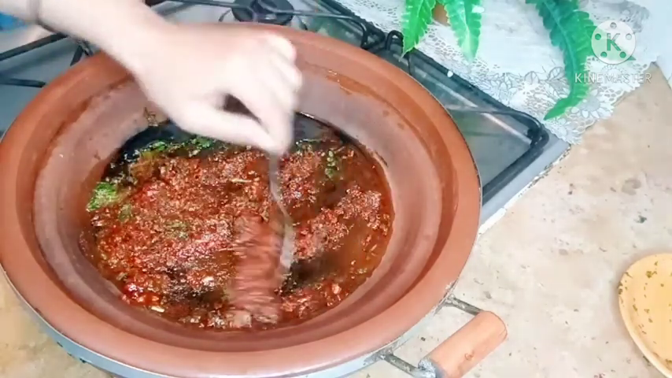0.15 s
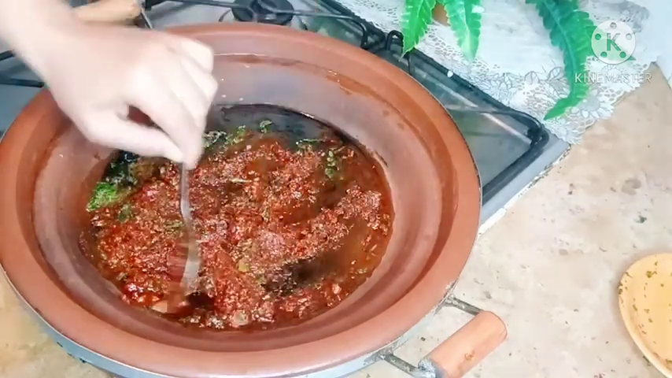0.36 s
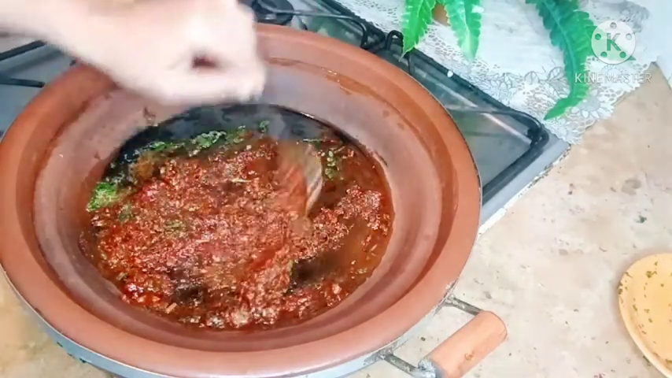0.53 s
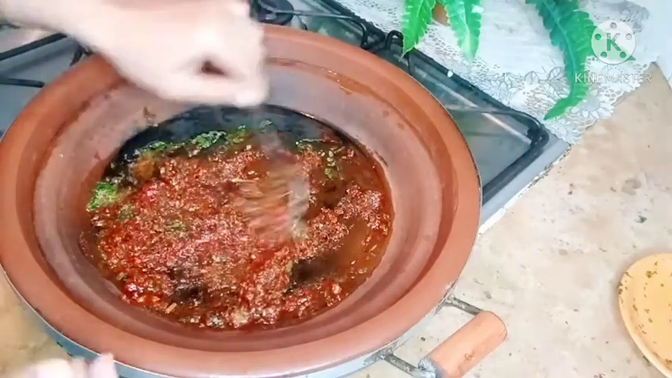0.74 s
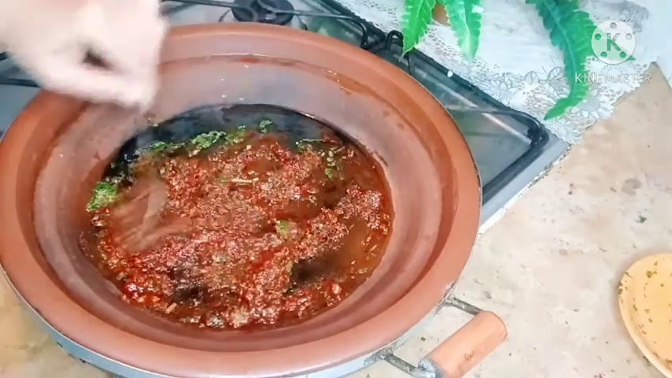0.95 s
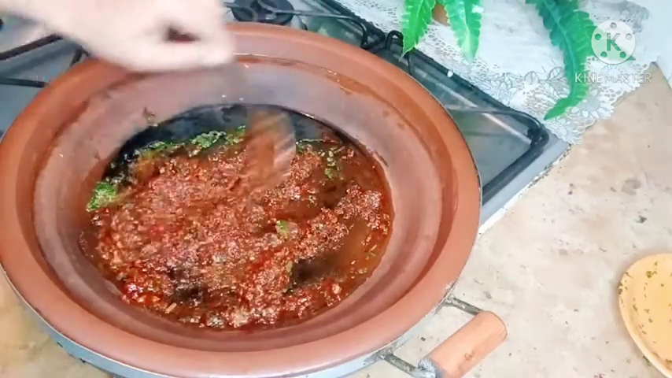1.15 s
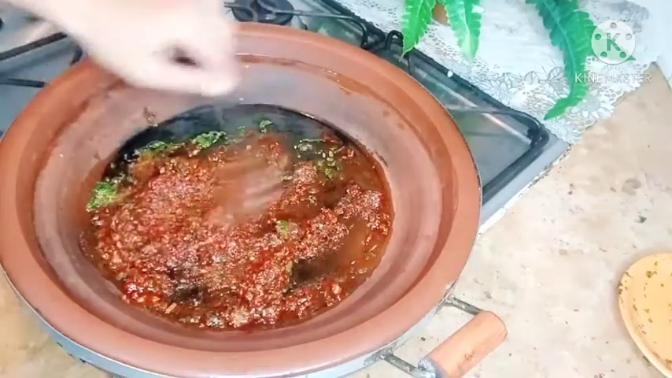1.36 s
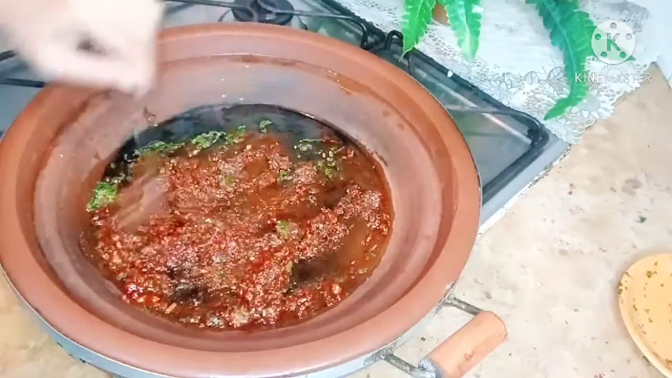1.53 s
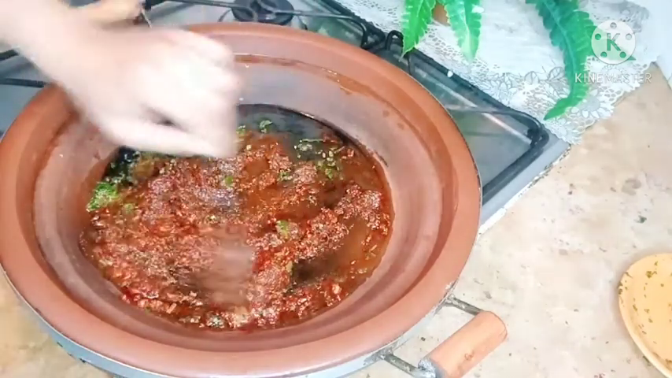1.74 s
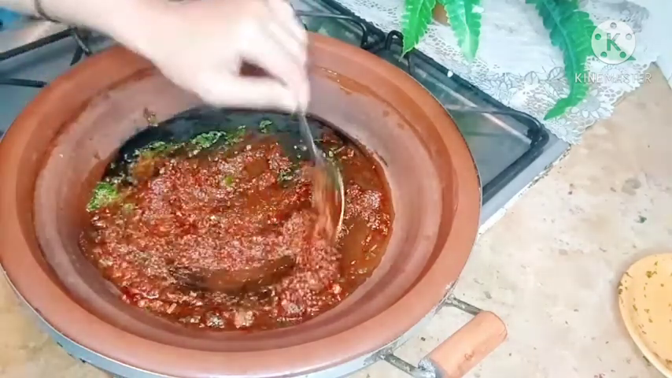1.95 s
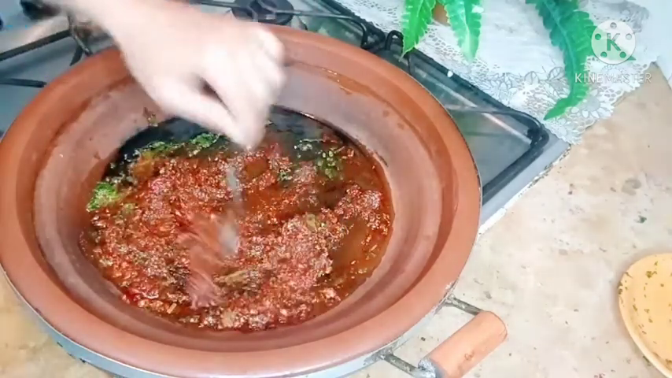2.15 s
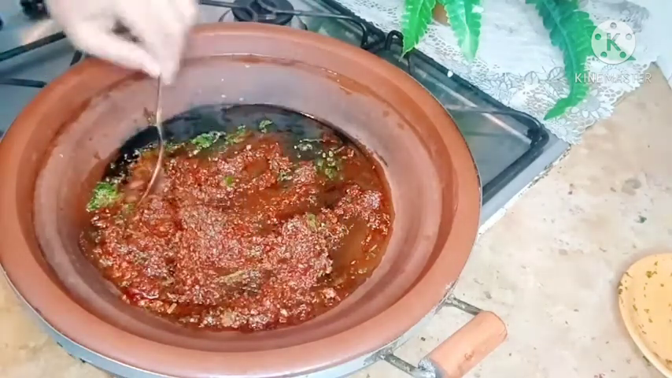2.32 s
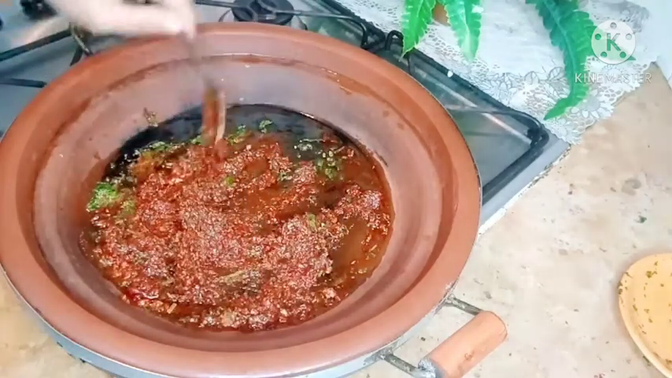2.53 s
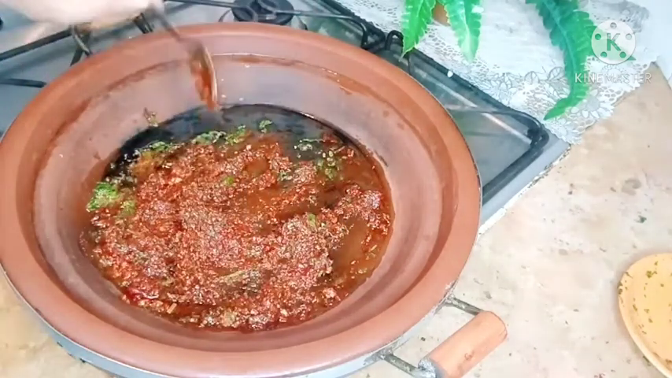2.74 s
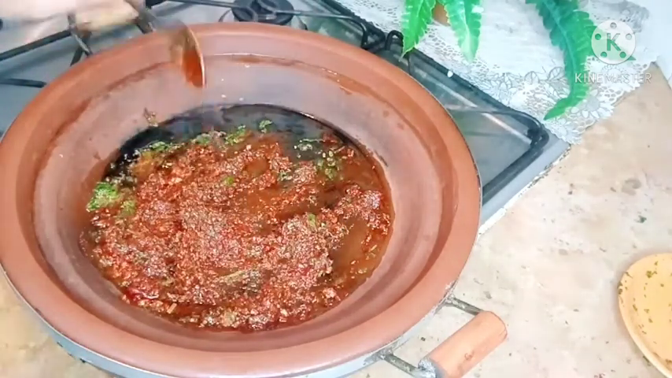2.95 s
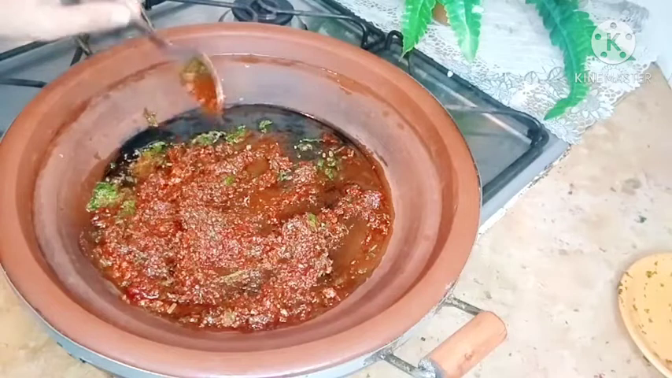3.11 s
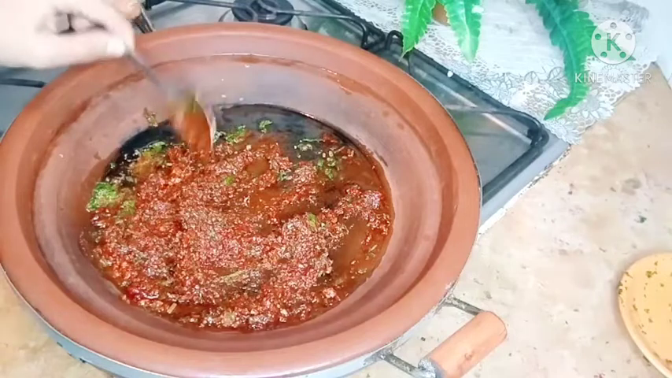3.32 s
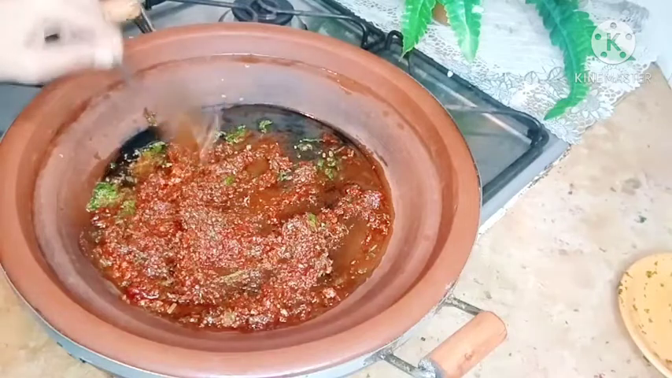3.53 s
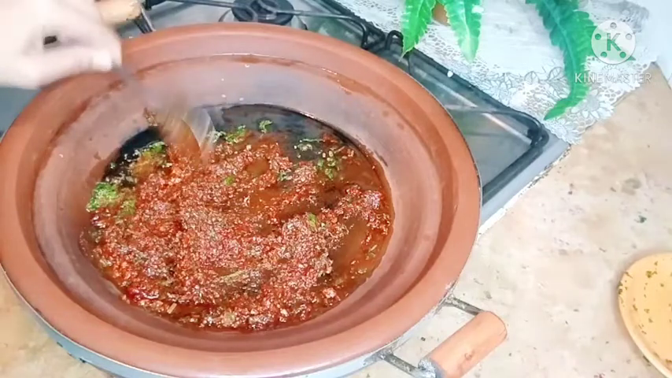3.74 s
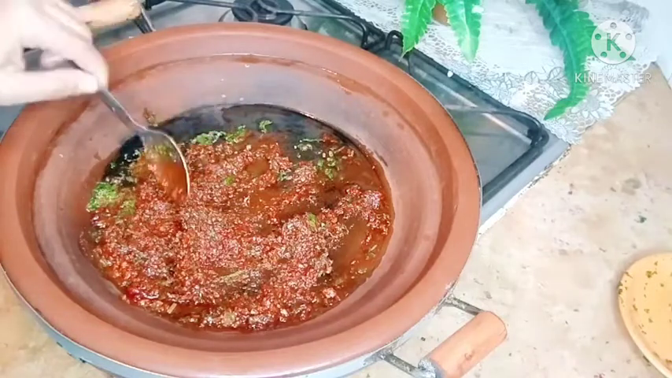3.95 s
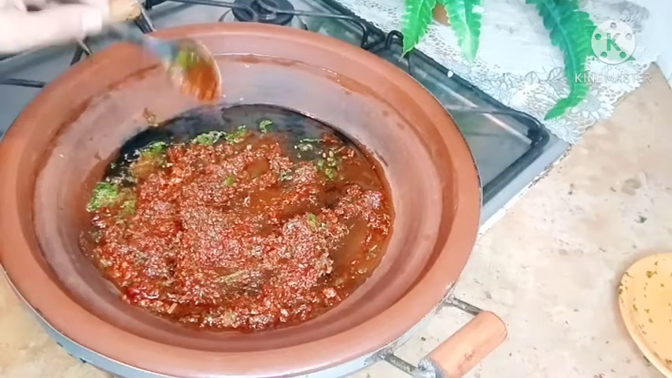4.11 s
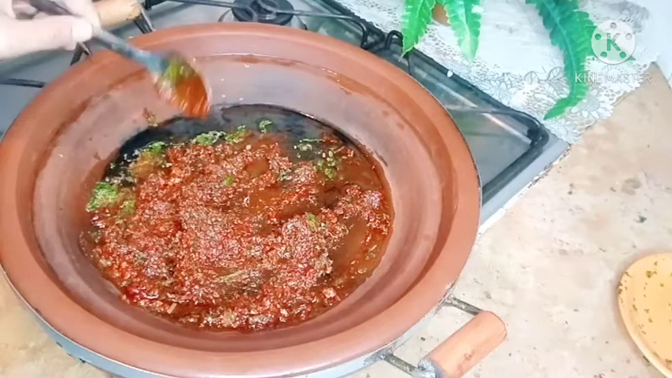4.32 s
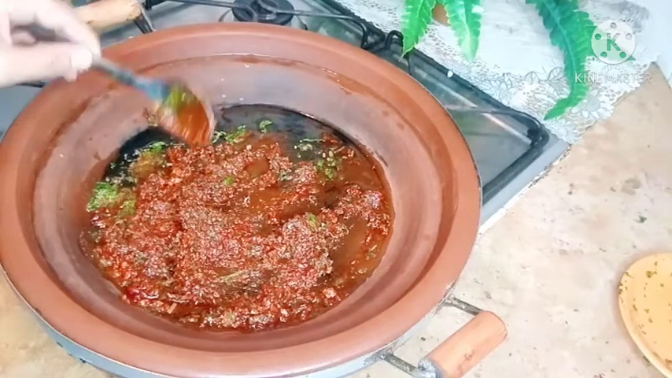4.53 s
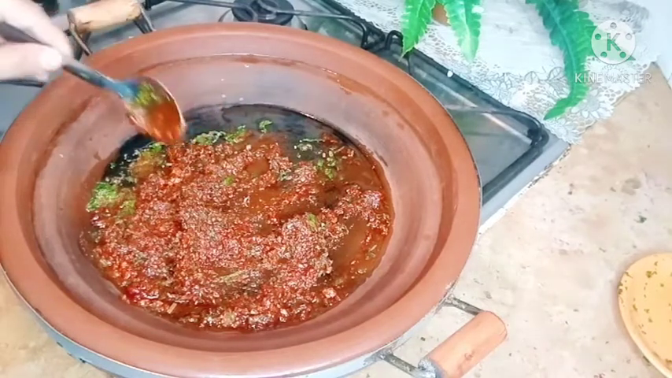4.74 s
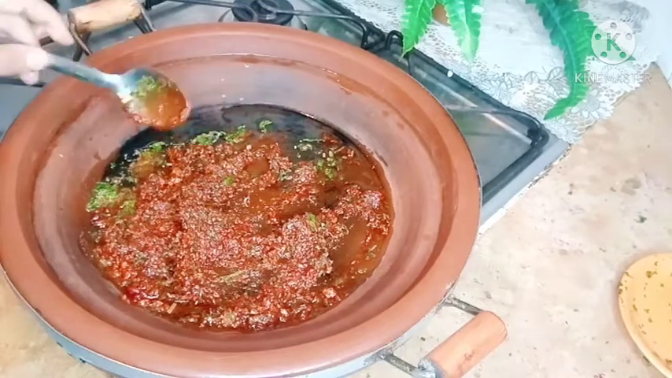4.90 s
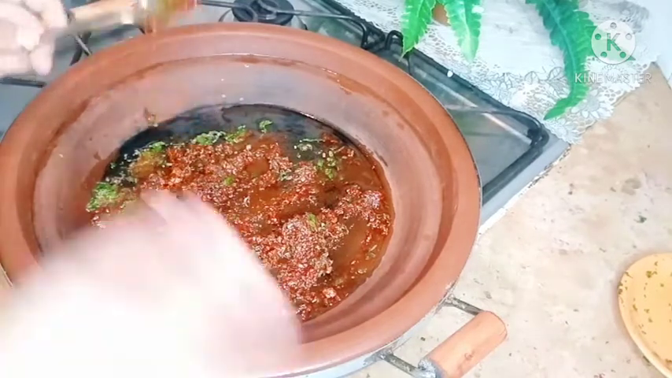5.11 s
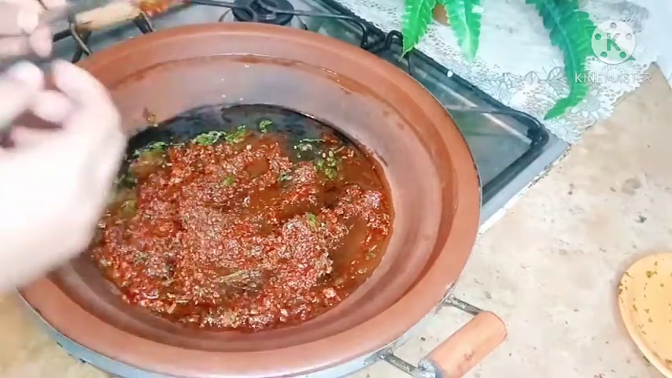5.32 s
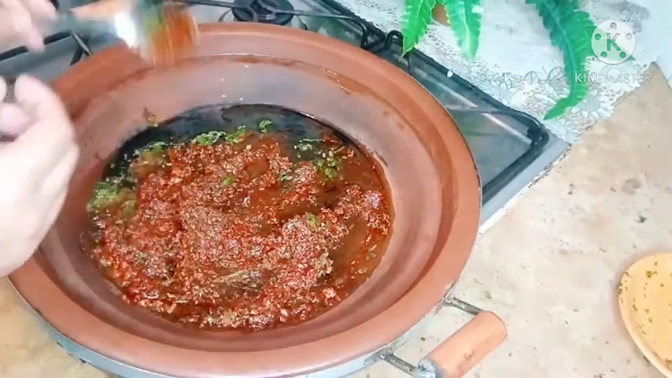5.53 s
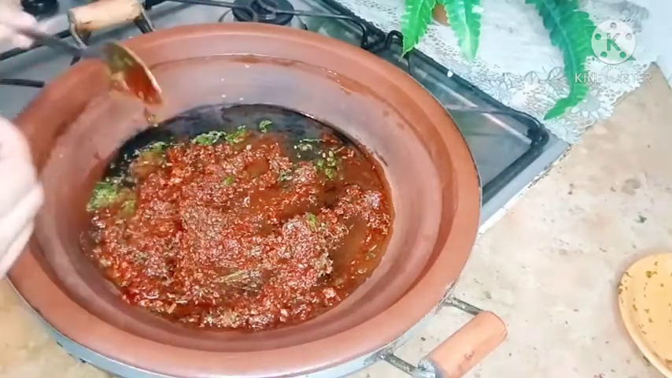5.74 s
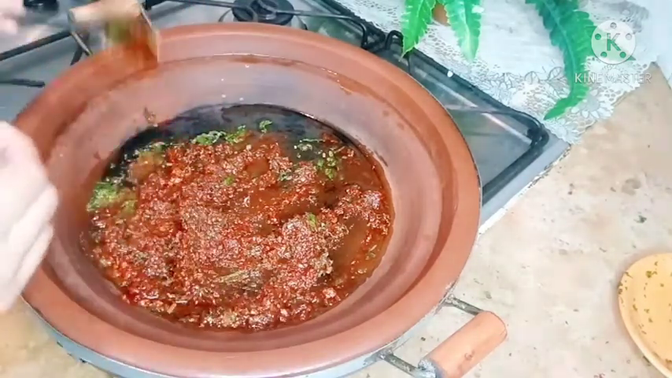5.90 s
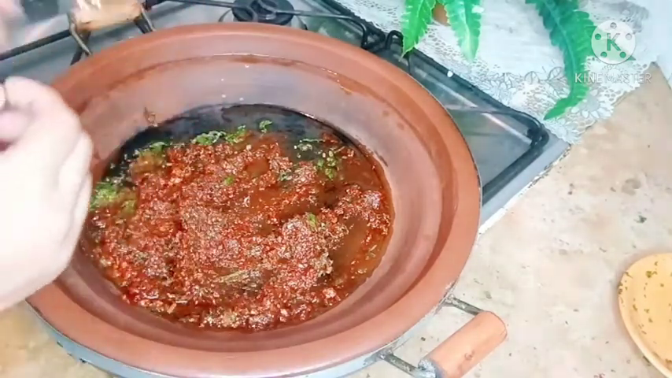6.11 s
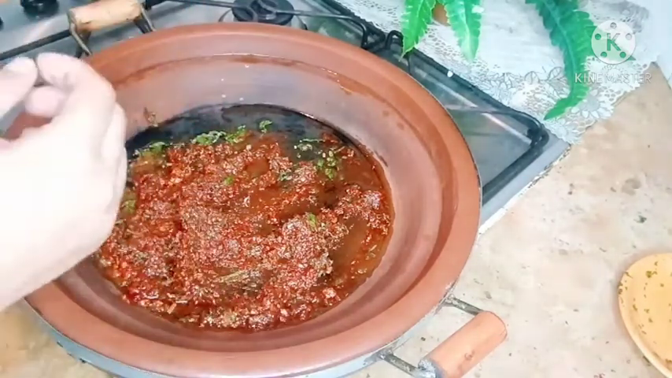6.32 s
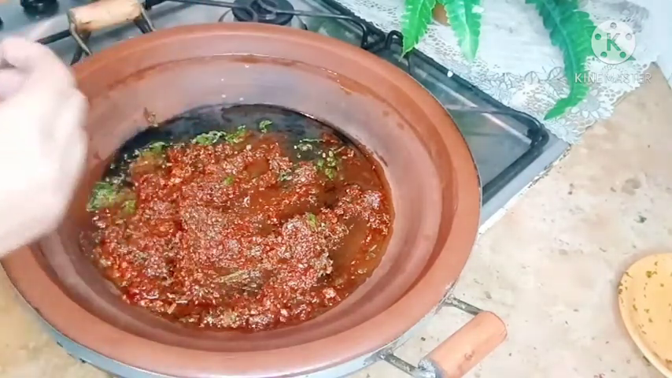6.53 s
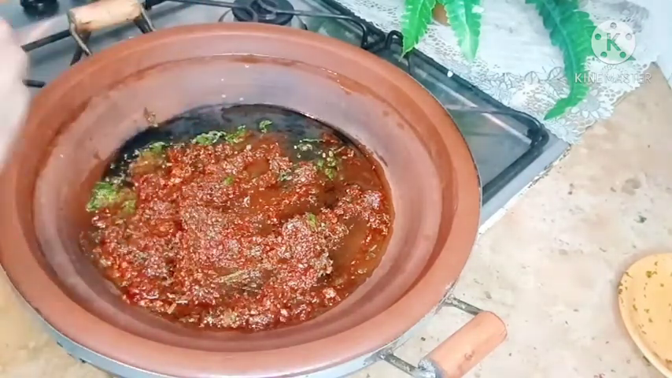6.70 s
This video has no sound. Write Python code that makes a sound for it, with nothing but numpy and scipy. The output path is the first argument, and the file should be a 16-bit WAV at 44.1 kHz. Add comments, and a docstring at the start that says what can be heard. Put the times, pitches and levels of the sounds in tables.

```python
"""A steel spoon stirs thick sauce in a clay pot on a gas stove, close by in a small kitchen.
Its scrapes are gritty noise through the pot's resonances; two raps on the wall also excite the spoon's own.
Smacks, bumps and one high squeak are short damped noise bursts; squelches mix noise, bubbles and ticks.
The burner rushes as noise in a hollow under the pot, the sauce simmers in a faint hiss with plops,
and an appliance hums on wavering sines over a low rumble."""
import sys
import numpy as np
from scipy import signal
from scipy.fft import rfft, irfft, next_fast_len
from scipy.io import wavfile
from scipy.ndimage import uniform_filter1d, map_coordinates

SR = 44100
rng = np.random.default_rng(int(sys.argv[2]) if len(sys.argv) > 2 else 0)


def wav_out(sig):
    """Save sig, one row per channel (or a flat mono array), as 16-bit PCM at SR to the path in sys.argv[1]."""
    wavfile.write(sys.argv[1], SR, np.round(np.clip(np.atleast_2d(sig).T, -1, 1) * 32767).astype(np.int16))


N = 302526
SPAN = np.arange(round(SR / 2)) / SR  # the time axis of one event, in seconds

# The filled pot's resonances. Each row: pitch in Hz, width in Hz, level in dB.
CLAY = [(328, 47, -2.5), (640, 135, -2), (946, 110, 2.5), (1216, 470, -0.5), (1773, 280, -0.5),
        (2024, 190, 0), (2540, 450, -3.5), (3220, 600, -3), (3910, 370, 0), (4780, 660, -1.5),
        (6220, 910, 2), (6980, 1850, -1.5), (10000, 3500, -5.5), (15220, 1660, -4.5)]


def amp(db):
    """Level law: 20 dB is a factor of ten in amplitude."""
    return 10 ** (np.asarray(db) / 20)


def unit(x):
    """Normalisation by mean power: scale to rms 1."""
    return x / np.sqrt(np.mean(x ** 2) + 1e-20)


def loudest(x, size):
    """Normalisation by short-time power: the loudest stretch of size samples gets rms 1."""
    power = uniform_filter1d(x ** 2, size, mode="constant")
    return x / np.sqrt(power.max() + 1e-20)


def along(points, hz):
    """Interpolation of (Hz, value) points on a logarithmic frequency axis."""
    f, v = np.transpose(points)
    return np.interp(np.log(hz + 1), np.log(f), v)


def filtered(x, response):
    """Linear filtering: the spectrum of x times a complex response of frequency."""
    m = next_fast_len(len(x) + SR // 4)  # the padding leaves room for the ringing
    spectrum = rfft(x, m) * response(np.fft.rfftfreq(m, 1 / SR))
    return irfft(spectrum, m)[:len(x)]


def peak(f, hz, width):
    """Damped resonance: a second-order band-pass with gain 1 at its centre."""
    return 1j * f * width / (hz * hz - f * f + 1j * f * width)


def low_edge(f, hz, width):
    """Fourth-order high-pass: the response falls away below hz."""
    return (1j * f / hz * peak(f, hz, width)) ** 2


def body(f, modes):
    """Modal superposition: resonances (Hz, width Hz, dB) summed with alternating sign."""
    return sum((-1) ** k * amp(db) * peak(f, hz, width) for k, (hz, width, db) in enumerate(modes))


def lift(f, hz, db, share):
    """Resonant emphasis: a boost around hz, share of hz wide."""
    return 1 + (amp(db) - 1) * peak(f, hz, share * hz)


def wobble(rate):
    """Slow random modulation: a smooth curve through rate random knots a second."""
    knots = rng.standard_normal(int(N * rate / SR) + 4)
    return map_coordinates(knots, [np.arange(N) * rate / SR])


def grit(size, rate, spread_db):
    """Random impulse train: about rate tiny hits a second of uneven strength, rms 1 overall."""
    hit = rng.random(size) < rate / SR
    sign = np.sign(rng.standard_normal(size))
    strength = amp(spread_db * np.clip(rng.standard_normal(size), -2, 2))
    return unit(hit * sign * strength)


def add(track, s, sound, room_db):
    """Reverberation: a sound at time s is joined by its convolution with a decaying noise tail."""
    # The kitchen's decay. Each row: frequency in Hz, time to fall by 60 dB in seconds.
    room_decay = [(150, 0.44), (1000, 0.36), (4000, 0.35), (8000, 0.29), (15000, 0.18)]
    hz, t, z = signal.stft(rng.standard_normal(len(SPAN)), SR, nperseg=256)
    decay = amp(-60 * t / along(room_decay, hz)[:, None])
    tail = signal.istft(z * decay, SR, nperseg=256)[1][:len(SPAN)]
    tail *= 1 - np.exp(-SPAN / 0.0008)  # the first walls take a moment to answer
    wet = signal.fftconvolve(sound, tail / np.linalg.norm(tail))[:len(sound)]
    part = track[max(round(s * SR), 0):][:len(sound)]
    part += (sound + amp(room_db) * wet)[:len(part)]


def bursts(rows, share, room_db):
    """Damped excitation: noise puffs (s, dB, Hz, life s) in one broad resonance, down 30 dB in a life."""
    out = np.zeros(N)
    for s, db, hz, life in rows:
        puff = rng.standard_normal(len(SPAN)) * amp(-30 * SPAN / life)
        sound = filtered(puff, lambda f: peak(f, hz, share * hz) ** 2)
        add(out, s, amp(db) * loudest(sound, size=130), room_db)
    return out


def bubble(hz, cycles):
    """Bubble oscillation: an air pocket rings and decays by 1/e in some cycles, its pitch rising a little."""
    t = SPAN[:SR // 10]
    opening = 1 - np.exp(-t * hz)
    return np.sin(2 * np.pi * hz * t * (1 + t)) * np.exp(-t * hz / cycles) * opening


def stove():
    """Cavity resonance: the flame flutters in the hollow under the pot, over rumble and a wavering hum."""
    # The hollow between burner and pot. Each row: pitch in Hz, width in Hz, level in dB.
    hollow_modes = [(1064, 18.6, -3), (1169, 45, -8.5), (1241, 31.5, 1.5), (1330.6, 47, -0.5),
                    (1484, 30, -5.5), (1634, 30, -8)]
    # The flame's mean level. Each row: time in seconds, level in dB.
    flame_level = [(3.7, -50.5), (5, -52), (6.86, -53.5)]
    # The spectrum of the room's rumble. Each row: frequency in Hz, level in dB.
    rumble_spectrum = [(20, -23.5), (48, -12), (60, 5), (68, 11), (80, 6), (95, 10.5), (120, 2.5), (185, 2),
                       (270, -6), (650, -3.5), (950, -4.5), (1800, -24), (6000, -48)]
    # The hum's partials. Each row: pitch in Hz, level in dB.
    hum_partials = [(98.5, -67), (148, -66)]
    t = np.arange(N) / SR
    flame = unit(filtered(rng.standard_normal(N), lambda f: body(f, hollow_modes) * peak(f, 1167, 900)))
    flame_db = np.interp(t, *np.transpose(flame_level))
    flutter_db = 1.7 * wobble(9) + 1.7 * wobble(35)
    rumble = unit(filtered(rng.standard_normal(N), lambda f: amp(along(rumble_spectrum, f))))
    rumble_db = -60.5 + 2.6 * wobble(7.7)
    hum = np.zeros(N)
    for hz, db in hum_partials:
        tone = np.sin(2 * np.pi * hz * t + 0.84 * wobble(8.8))  # the phase wanders
        hum += amp(db + 2.6 * wobble(11.0)) * unit(tone)
    return amp(flame_db + flutter_db) * flame + amp(rumble_db) * rumble + hum


def simmer():
    """Shot noise: countless tiny bubbles burst in a faint, nearly even hiss."""
    # The spectrum of the hiss. Each row: frequency in Hz, level in dB.
    hiss_spectrum = [(300, 2.5), (800, 5), (2000, 2), (3000, 2), (6000, 2), (10000, -2), (15500, 2.5)]
    fizz = rng.standard_normal(N) + 0.55 * grit(N, rate=400, spread_db=4)
    hiss = unit(filtered(fizz, lambda f: amp(along(hiss_spectrum, f))))
    return amp(-59.5 + 0.9 * wobble(2.66)) * hiss


def plops():
    """Bubble oscillation: 45 larger bubbles open at random moments, the higher ones weaker on average."""
    out = np.zeros(N + SR)
    for when, pitch, strength in rng.random(size=(45, 3)):
        level_db = -66.5 + 7 * strength - 4 * pitch
        ring = amp(level_db) * bubble(300 * 9 ** pitch, cycles=5.15)  # 300 to 2700 Hz
        out[int(when * N):][:len(ring)] += ring
    return out[:N]


def scrapes():
    """Stick-slip friction: the edge slips over the clay's grains; its place favours two resonances."""
    # Strokes of the spoon on the clay. Each row: start in seconds, length in seconds, level in dB,
    # favoured hollow in Hz, its boost in dB, low edge in Hz, brightness in dB per octave.
    strokes = [(0.010, 0.019, -34, 1110, 5.5, 616, -3), (0.033, 0.049, -23.5, 1080, 9.5, 550, 0.2),
               (0.362, 0.014, -31, 1050, 11.5, 740, 4.5), (0.7418, 0.014, -39, 665, 10.5, 565, -5.5),
               (1.326, 0.028, -26, 610, 10.5, 560, -1.15), (1.615, 0.14, -38.5, 1100, 5.5, 456, -3),
               (1.706, 0.067, -20, 890, 2, 620, 0.74), (2.001, 0.034, -36, 1030, 5, 454, -5),
               (2.603, 0.11, -36, 1120, 6, 606, -1.5), (2.62, 0.044, -30, 1020, 8.5, 730, -2.5),
               (2.633, 0.031, -23.5, 1070, 10.5, 730, -2.5), (4.584, 0.02, -33.5, 1300, 5, 380, -1.5),
               (6.568, 0.037, -42.5, 1600, 8, 360, -4.5)]
    swell_share = 0.38  # the part of a stroke in which the pressure builds
    upper_ratio = 2.44  # the second favoured resonance over the first
    out = np.zeros(N)
    for start, length, db, hollow_hz, hollow_db, edge_hz, bright in strokes:
        swell, fade = swell_share * length, (1 - swell_share) * length
        # a sharp touch, the swell, the fade and the release
        press = np.interp(SPAN, np.cumsum([0, .001, swell, fade, .005]), [1.0, 0.5, 0.7, 0.27, 0])
        catches = amp(2.1 * wobble(329)[:len(SPAN)])  # the edge catches and lets go every few milliseconds
        grains = grit(len(SPAN), rate=2000, spread_db=0) + 0.31 * rng.standard_normal(len(SPAN))

        def pot(f):
            lower = lift(f, hollow_hz, hollow_db, share=0.22)
            upper = lift(f, upper_ratio * hollow_hz, db=6, share=0.3)
            tilt = amp(bright * np.log2(np.clip(f, 500, 9000) / 1500))
            return body(f, CLAY) * lower * upper * tilt * low_edge(f, edge_hz, 1.025 * edge_hz)

        sound = filtered(press * catches * grains, pot)
        add(out, start, amp(db) * loudest(sound, size=600), room_db=-9)
    return out


def bumps():
    """Heavily damped resonance: the pot and its filling give a dull bump when pushed or struck."""
    # Soft low bumps of sauce and pot. Each row: time in seconds, level in dB, pitch in Hz.
    bump_rows = [(0.195, -49.5, 310), (0.258, -46, 594), (2.640, -37, 340), (2.780, -48.5, 55),
                 (4.481, -47, 470), (4.666, -34, 680), (4.672, -41.5, 320), (4.690, -45.5, 130),
                 (5.432, -47, 500), (5.920, -53, 79.7)]
    life_s = 0.066
    return bursts([(s, db, hz, life_s) for s, db, hz in bump_rows], share=1.0, room_db=-2.0)


def smacks():
    """Adhesive release: sauce tears off the spoon, which squeaks once; a louder burst is a shorter one."""
    # Sticky smacks, and one high squeak of the spoon at 0.357 s.
    # Each row: time in seconds, level in dB, pitch in Hz.
    smack_rows = [(0.351, -42.5, 3560), (0.357, -35, 14900), (0.471, -44, 7700), (0.725, -42.5, 8550),
                  (0.756, -44, 5360), (0.866, -45, 7900), (0.989, -47.5, 8100), (1.092, -42, 8060),
                  (1.316, -39, 5370), (1.405, -48, 6450), (1.532, -32, 5800), (2.092, -40.5, 10600),
                  (2.272, -42.5, 6260), (2.553, -29.5, 8100), (2.817, -47, 4830), (4.330, -47.5, 6600),
                  (5.092, -46.5, 5530), (5.242, -52, 5200), (5.522, -47.5, 5740), (6.076, -51.5, 3240),
                  (6.453, -47, 6360), (6.572, -39, 6500)]
    typical_life_s, typical_db, life_halves_db = 0.025, -37.5, 9
    rows = []
    for s, db, hz in smack_rows:
        life = typical_life_s * 2 ** ((typical_db - db) / life_halves_db)
        rows.append((s, db, hz, life))
    return bursts(rows, share=.6, room_db=-9)


def squelch_gain():
    """Amplitude envelope of the squelch: silent outside the spells, where the spoon may scrape instead."""
    # Spells of squelching, one list each. Each row: time in seconds, level in dB.
    spells = [
        [(0.8, -72), (0.934, -89), (1.0, -59.5), (1.104, -69.5), (1.124, -61), (1.154, -88), (1.28, -86)],
        [(1.55, -53), (1.602, -58.5), (1.648, -48), (1.66, -50), (1.7, -54)],
        [(2.05, -57.5), (2.104, -60), (2.206, -55), (2.222, -61), (2.346, -53.5), (2.456, -71.5), (2.6, -47.5)],
        [(2.72, -54.5), (2.946, -82), (3.12, -57.5), (3.334, -83), (3.478, -58), (3.688, -80.5), (3.7, -82)],
        [(5.15, -85), (5.268, -60), (5.342, -82), (5.438, -63), (6.062, -73.5), (6.074, -61), (6.25, -72)],
        [(6.61, -49), (6.634, -60.5), (6.658, -51), (6.734, -70), (6.744, -69), (6.776, -82), (6.8, -72)],
    ]
    ease_s = 0.03  # a spell starts and stops this gently
    t, gain = np.arange(N) / SR, np.zeros(N)
    for spell in spells:
        s, db = np.transpose(spell)
        gain += amp(np.interp(t, s, db)) * (t >= s[0]) * (t <= s[-1])
    return uniform_filter1d(gain, max(int(ease_s * SR), 1))


def swishes():
    """Modulated noise: wet rustle, air pockets, low slop and fine ticks round the spoon share one envelope."""
    rustle_db, rustle_hz = -0.5, 3740
    clump_db, clumps_per_s = 3, 70  # lumps in the sauce make the rustle uneven
    pocket_db, pocket_hz, pockets_per_s, pocket_spread_db = -0.5, 2806, 220, 17
    slop_db, slop_hz = -3.5, 630  # the mass of sauce that is pushed aside
    tick_db, tick_hz, ticks_per_s = -6, 7370, 78  # threads of sauce snapping

    rustle = filtered(rng.standard_normal(N), lambda f: peak(f, rustle_hz, 1.6 * rustle_hz))
    rustle = unit(rustle * amp(clump_db * wobble(clumps_per_s)))
    slop = filtered(rng.standard_normal(N), lambda f: peak(f, slop_hz, 1.7 * slop_hz) ** 2)
    slop = unit(slop * amp(1.5 * wobble(30)))
    snaps = grit(N, rate=ticks_per_s, spread_db=1)
    ticks = unit(filtered(snaps, lambda f: peak(f, tick_hz, 0.51 * tick_hz) ** 2))
    pockets = np.zeros(N + SR)
    for when, pitch, strength in rng.random(size=(int(pockets_per_s * N / SR), 3)):
        hz = pocket_hz * 2 ** (2.4 * (pitch - .5))  # up to 1.2 octaves either way
        ring = amp(pocket_spread_db * strength) * bubble(hz, cycles=25)
        pockets[int(when * N):][:len(ring)] += ring
    squelch = amp(rustle_db) * rustle + amp(pocket_db) * unit(pockets[:N])
    squelch += amp(slop_db) * slop + amp(tick_db) * ticks
    out = np.zeros(N)
    add(out, 0, squelch_gain() * squelch, room_db=-6)
    return out


def raps():
    """Impact excitation of modes: the spoon chatters on the wall for milliseconds; steel rings, clay knocks."""
    # Spoon striking the wall. Each row: time in seconds, level in dB, chatter in seconds,
    # favoured pitch in Hz, its boost in dB, the steel's low edge in Hz, clay knock in dB re the level.
    strikes = [(4.478, -13.5, 0.0093, 5210, 2.5, 2950, -20), (4.664, -12.5, 0.0083, 3950, 9.5, 3030, -15)]
    # The spoon's resonances. Each row: pitch in Hz, width in Hz, level in dB.
    spoon_modes = [(2725, 670, -8), (3575, 360, -2), (3840, 540, -0.5), (4320, 200, -3), (4636, 190, -4.5),
                   (5040, 280, -1), (5440, 430, -5.5), (5730, 240, 0.5), (6560, 460, -3.5),
                   (7226, 150, -0.5), (7670, 180, -5), (8630, 700, -7), (10700, 2900, -8.5),
                   (15100, 540, -8.5)]
    out = np.zeros(N)
    for s, db, chatter, favoured_hz, favoured_db, edge_hz, knock_db in strikes:
        pressure = np.exp(-(SPAN / chatter - .35) ** 2)  # the contact tightens, then lets go
        contact = grit(len(SPAN), rate=9000, spread_db=4.0) * pressure

        def held_spoon(f):
            grip = low_edge(f, edge_hz, edge_hz)  # the fingers damp the lowest modes
            return body(f, spoon_modes) * lift(f, favoured_hz, favoured_db, share=0.3) * grip

        steel = filtered(contact, held_spoon)
        clay = filtered(contact, lambda f: body(f, CLAY) * peak(f, 580, 2210))
        add(out, s, amp(db) * loudest(steel, size=400), room_db=-2.0)
        add(out, s, amp(db + knock_db) * loudest(clay, size=400), room_db=0.0)
    return out


def scene():
    """Mid-side stereo: the pot is straight ahead; a faint unrelated noise differs between the two channels."""
    sauce = smacks() + bumps() + swishes()
    add(sauce, 0, simmer() + plops(), room_db=-5.5)
    mid = scrapes() + raps() + sauce + stove()
    side = amp(-28.0) * stove() + amp(-15) * simmer()  # fresh draws, unrelated to the middle
    return np.array([mid + side, mid - side])


def record(dry):
    """Frequency response: the microphone's port colours the treble; nothing passes the band limit."""
    # The microphone's response. Each row: frequency in Hz, gain in dB.
    port_response = [(6050, -0.5), (6600, -6.5), (7200, 7), (7750, 4), (8300, -3.5), (10000, -12.5),
                     (13500, -14.5), (15000, -7), (15600, -3)]
    top_hz = 15750
    microphone = lambda f: amp(along(port_response, f)) * (f < top_hz)
    return np.array([filtered(channel, microphone) for channel in dry])


dry = scene()
out = record(dry)
wav_out(out)
```